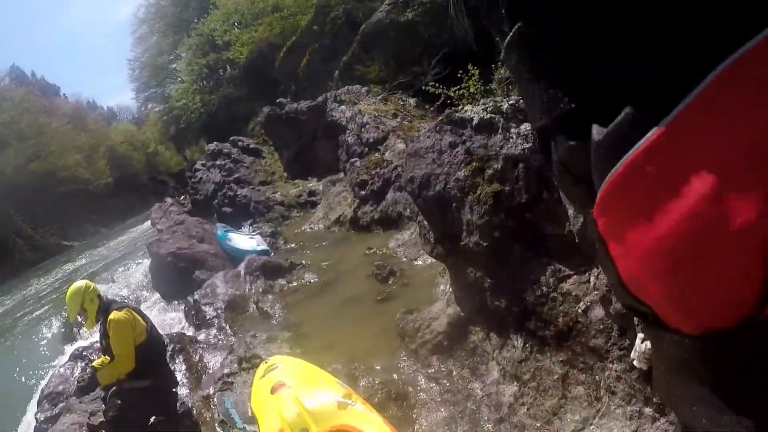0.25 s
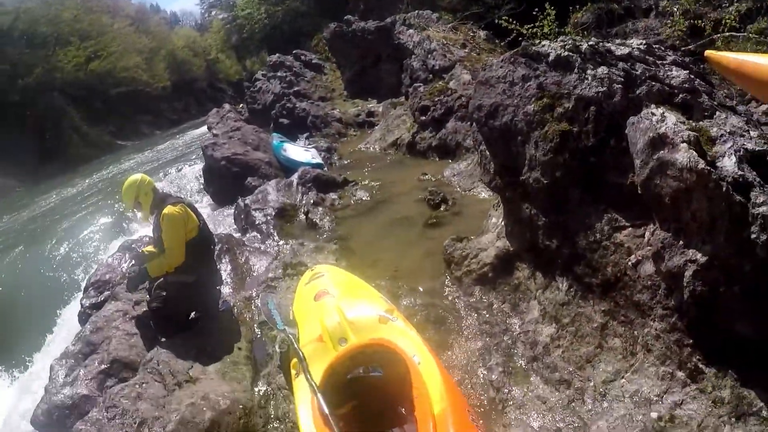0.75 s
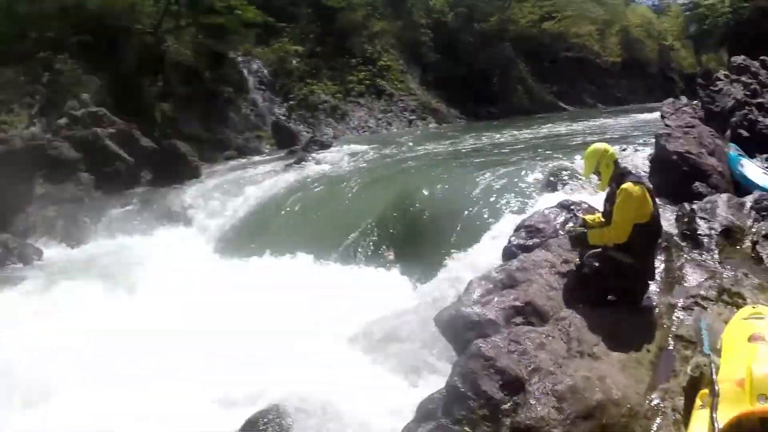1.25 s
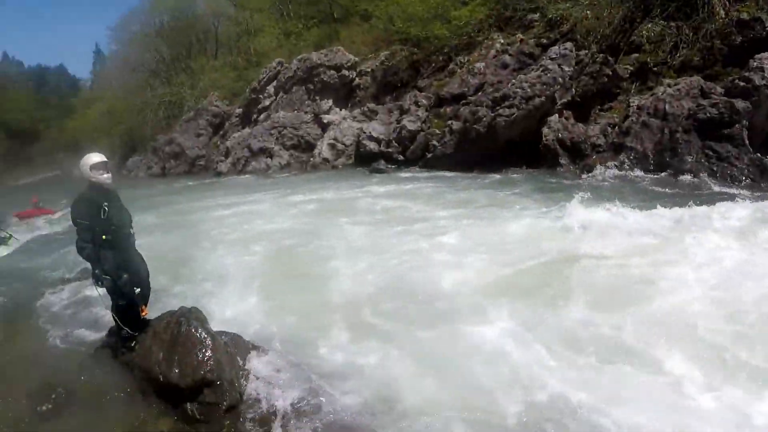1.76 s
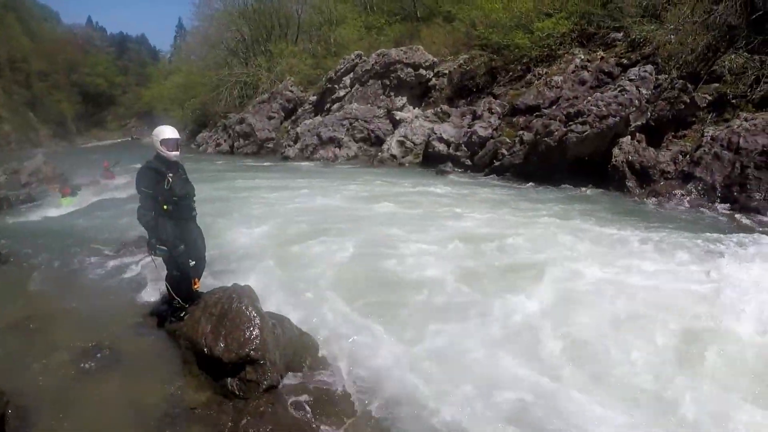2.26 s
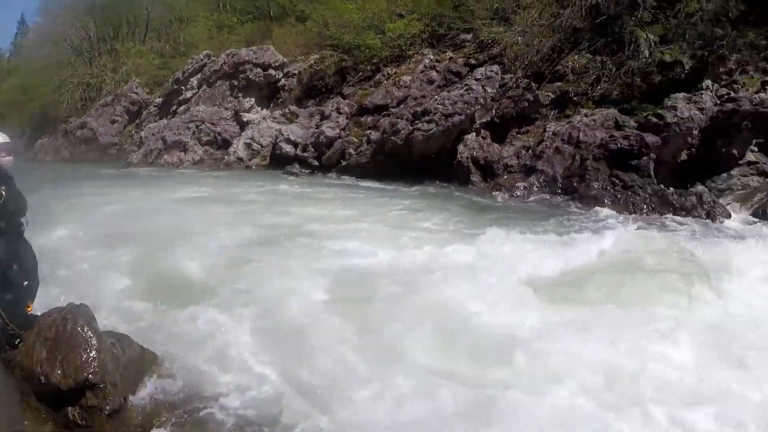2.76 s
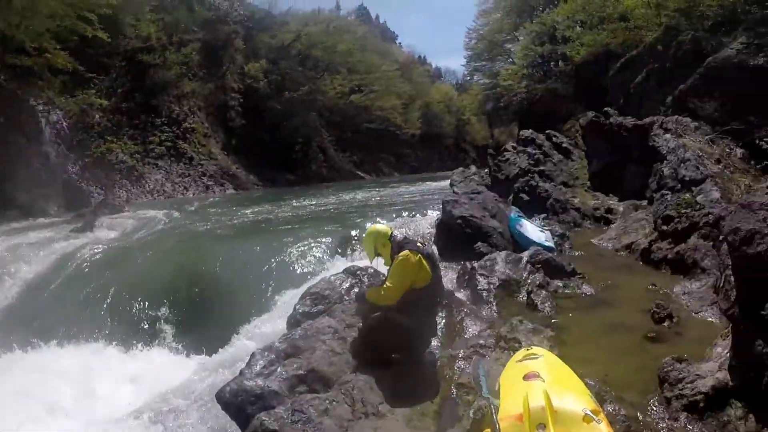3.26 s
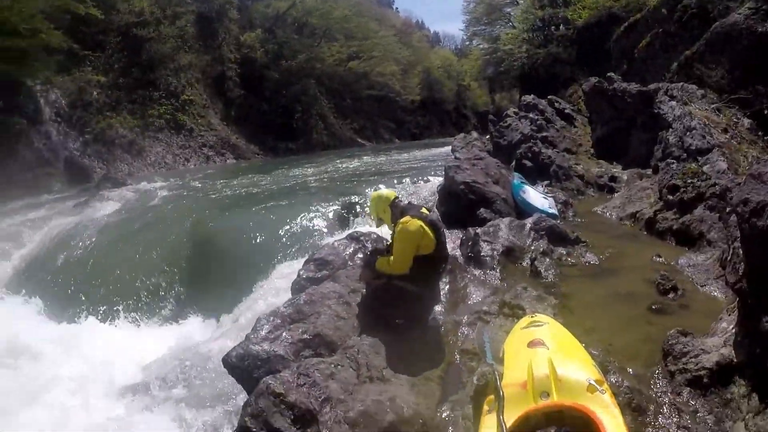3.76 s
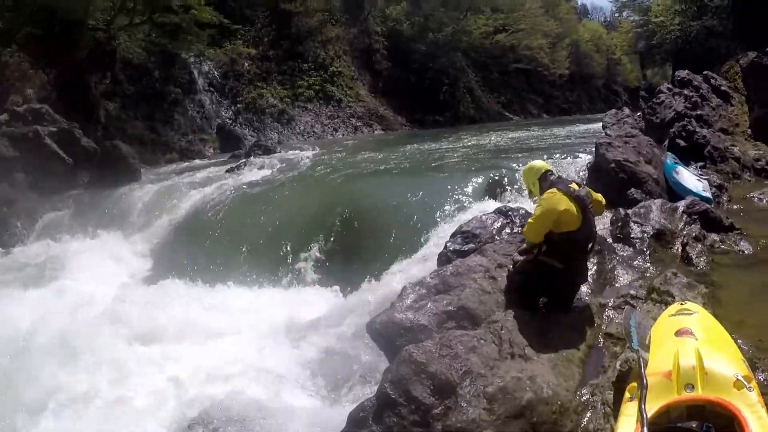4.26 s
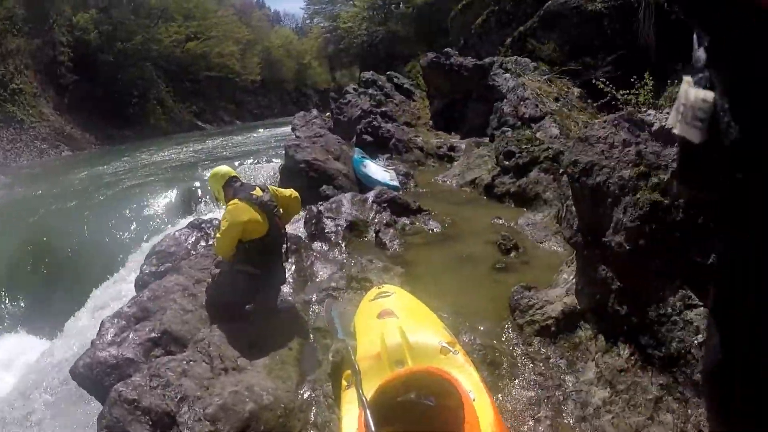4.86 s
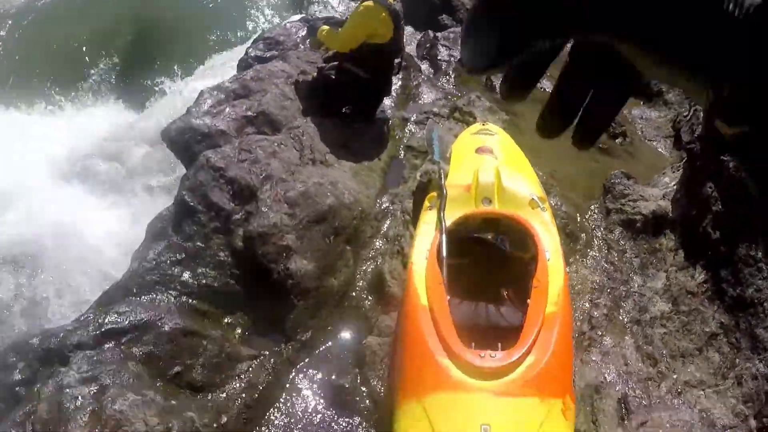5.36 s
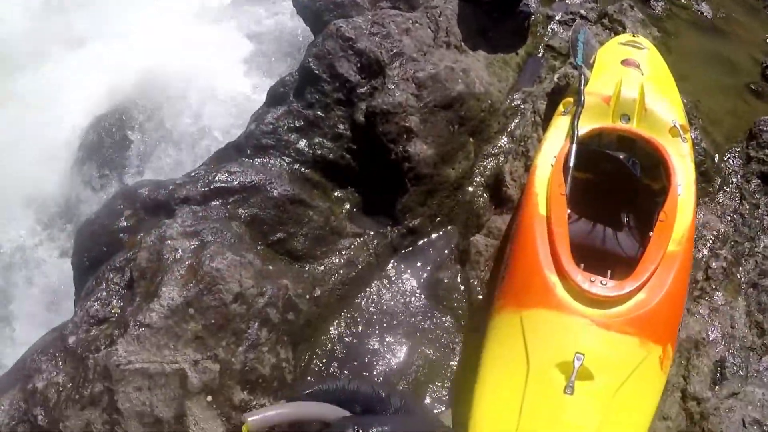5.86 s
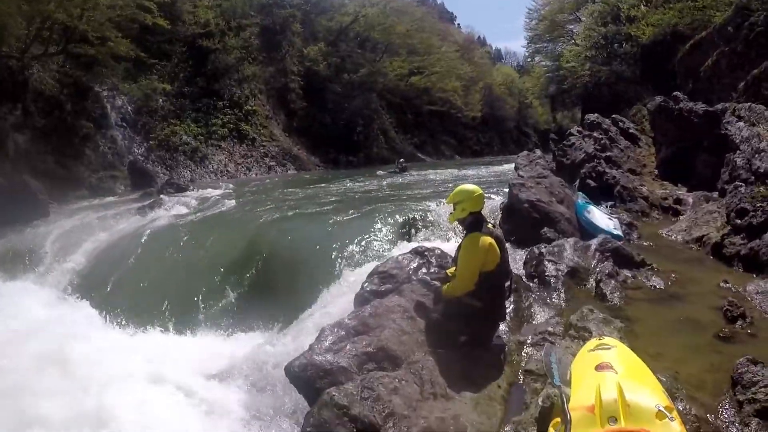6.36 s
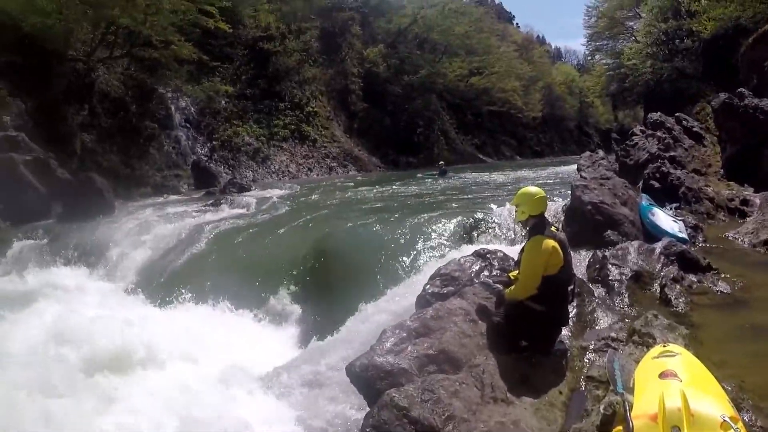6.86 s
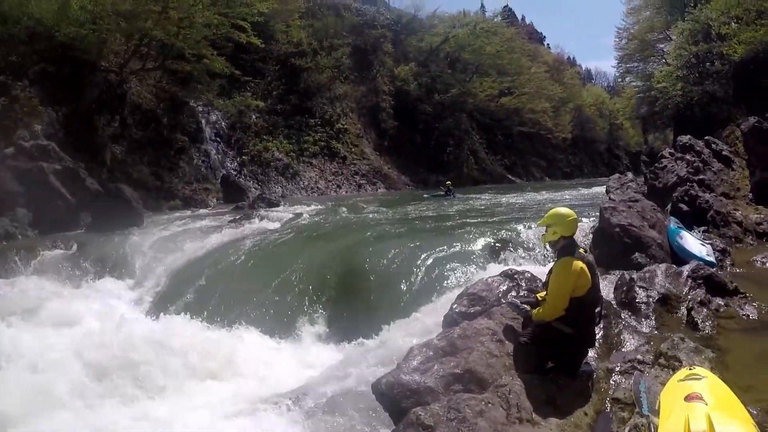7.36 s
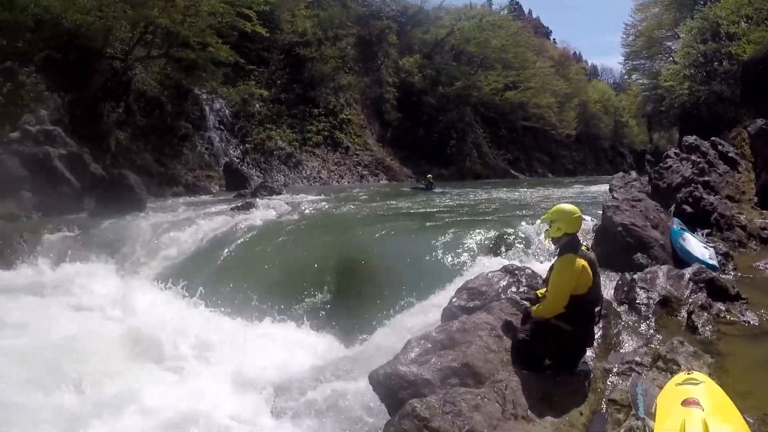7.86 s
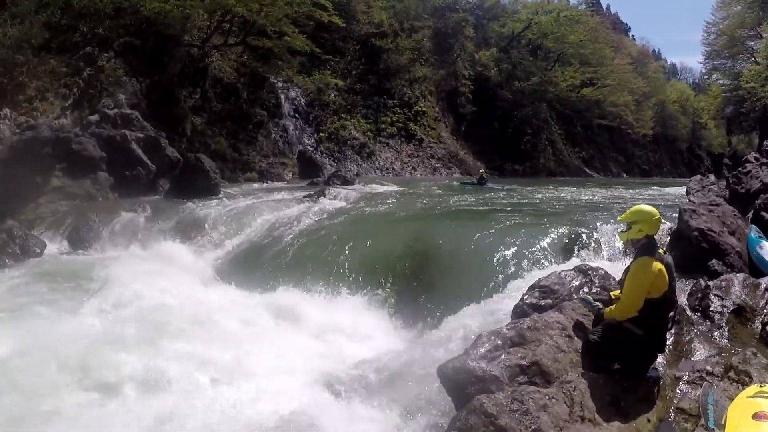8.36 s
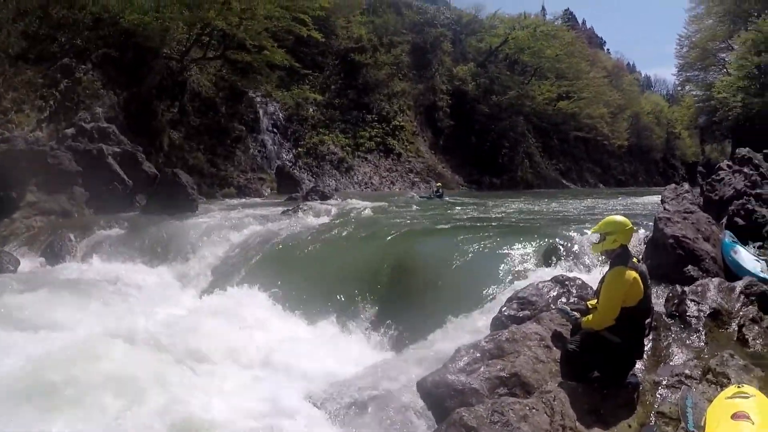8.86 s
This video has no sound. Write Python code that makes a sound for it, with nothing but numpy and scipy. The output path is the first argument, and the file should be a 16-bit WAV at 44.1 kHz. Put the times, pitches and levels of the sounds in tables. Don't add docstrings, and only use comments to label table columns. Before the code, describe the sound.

Outdoors on river rocks, white water pours over a ledge into a hole: a low roar, dense bubbling rush and faint high spray hiss, continuous for about 9 seconds. It is heard close through a sealed helmet housing, so it sounds boxy, with ringing resonances. From 0 to 1.2 s wind bumps softly over the water; around 1.2-1.6 s the head swings downstream, changing the tone and bringing more wind flutter. Low thumps and a strap drag come at 2.6-2.7 s, then the colour returns to the ledge near 3 s, with another rub. It is calmer until a thump at 4.76 s. At 5.15 s the strap snaps with a sharp, hard knock, during a brief heave of roar, followed by rubbing and deep pushes to 5.6 s as the head tips down. A small tick at 6.0 s cuts the wind; steady water continues to the end.

```python
import sys
import numpy as np
from scipy import signal
from scipy.fft import rfft, irfft, next_fast_len
from scipy.io import wavfile
from scipy.ndimage import uniform_filter1d, map_coordinates

SR = 44100
rng = np.random.default_rng(int(sys.argv[2]) if len(sys.argv) > 2 else 0)


def nominal_scale(level):
    x = np.asarray(level, float) / 20
    return 10 ** x


def dump_mix(stems):
    frames = np.atleast_2d(stems).T
    limited = np.clip(frames, -1, 1)
    pcm = np.round(limited * 32767).astype(np.int16)
    wavfile.write(sys.argv[1], SR, pcm)


N = 401751


def unit(x):
    return x / np.sqrt(np.mean(x ** 2) + 1e-20)


def noise():
    return rng.standard_normal(N)


def along(points, hz):
    f, v = np.transpose(points)
    return np.interp(np.log(hz + 1), np.log(f + 1), v)


def curves(rows, t=None):
    s, *cols = np.transpose(rows)
    t = np.arange(N) / SR if t is None else t
    return [np.interp(t, s, c) for c in cols]


def wobble(rate):
    knots = rng.standard_normal(int(N * rate / SR) + 4)
    return map_coordinates(knots, [np.arange(N) * rate / SR])


def coloured(x, spectrum):
    m = next_fast_len(N + SR // 2)
    gain = nominal_scale(along(spectrum, np.fft.rfftfreq(m, 1 / SR)))
    return unit(irfft(rfft(x, m) * gain, m)[:N])


def smoothed(x, size, axis=-1):
    return uniform_filter1d(uniform_filter1d(x, size, axis=axis), size, axis=axis)


def evened(x, seconds, share):
    power = np.abs(smoothed(x ** 2, round(seconds * SR)))
    return unit(x / (power + 0.02) ** (share / 2))


def hump(s, length):
    return np.exp(-(2 * (np.arange(N) / SR - s) / max(length, 0.02)) ** 2)


def gusty(calm_db, events):
    swells = sum((nominal_scale(db) * hump(s, length)) ** 2 for s, db, length in events)
    return np.sqrt(nominal_scale(calm_db) ** 2 + swells)


# time in seconds, turn downstream from 0 to 1, tip down from 0 to 1,
# low-mid echo from the rocks in dB; turn and tip both 0 face the ledge.
HEAD_POSE = [(0, 0.24, 0.2, 5.5), (.3, 0.3, 0.13, 7), (.75, 0.2, 0.7, 2.5), (1.05, 0.16, 0.4, 1.5),
             (1.2, 0.27, 0, -1), (1.4, 0.77, 0.05, 0.5), (1.6, 0.98, 0, -0.5), (2.85, 0.88, 0.4, 1),
             (3.05, 0.08, 0, 1), (4.5, 0, 0.03, 1), (4.75, 0.14, 0.27, 1), (5.05, 0.28, 0.3, 2),
             (5.3, 0.13, 0.45, 4), (5.6, 0, 1, 1), (5.95, 0.06, 0.6, 4), (6.15, 0.09, 0.2, 1.5),
             (7.5, 0.09, 0.08, 1), (9.11, 0.07, 0.2, 0)]


def head_pose(t=None):
    return curves(HEAD_POSE, t)


# frequency in Hz, level in dB per Hz.
ROAR_FACING = [(12, -64), (20, -34), (81, -37), (119, -42), (142, -3.5), (161, 0.5), (198, -4), (249, -0.5),
               (323, -9.5), (396, -14), (448, -13.5), (466, -23), (520, -21.5), (680, -46), (1140, -120)]
ROAR_TURNED = [(74, -42), (128, -3), (177, -6.5), (199, -5), (216, -7), (253, -11), (275, 2), (338, -3),
               (520, -22.5), (680, -61), (1140, -120)]
# middle in seconds, length in seconds, gain in dB.
ROAR_SWELLS = [
    (0, 0.22, 3.5),
    (1.24, 0.41, 2),
    (3.17, 0.19, 3),
    (3.75, 0.36, 2),
    (4.5, .4, 1),
    (5.286, 0.3, 7),
    (5.85, 0.74, 3),
    (7.55, 0.5, 1.5),
]


def roar(surge):
    turn, _, _ = head_pose()
    swell_db = sum(db * hump(s, length) for s, length, db in ROAR_SWELLS)
    facing = np.sqrt(1 - turn) * coloured(noise(), ROAR_FACING)
    turned = np.sqrt(turn) * coloured(noise(), ROAR_TURNED)
    return nominal_scale(-41.5 + swell_db + 0.18 * surge + 1.13 * wobble(13)) * (facing + turned)


def bubbles(count, mid_hz, spread, cycles, size_db):
    at, size = rng.random((count, 2)).T
    hz = mid_hz * np.exp(spread * rng.standard_normal(count))
    hz = np.clip(hz, 700, 9000)[:, None]
    k = np.arange(512)
    turns = hz * k / SR
    ring = np.sin(2 * np.pi * turns * (1 + 0.092 * turns / cycles))
    grain = ring * np.exp(-3 * turns / cycles) * (1 - np.exp(-turns))
    grain = grain * nominal_scale(-size_db * np.log(1 - size))[:, None] * np.sqrt(hz / mid_hz)
    places = (at * N).astype(int)[:, None] + k
    return unit(np.bincount(places.ravel(), grain.ravel(), N + len(k))[:N])


def bumps(modes, hz):
    return sum(db / (1 + (2 * (hz - c) / w) ** 2) for c, w, db in modes)[:, None]


# frequency in Hz, width in Hz, gain in dB (negative = notch).
LEDGE_MODES = [(1012, 36, 14.5), (1442, 39, 13), (1550, 60, -2.5), (1682, 127, 8), (1878, 108, 11),
               (2050, 90, -2.5), (2126, 92, 6), (2940, 290, 3.5), (3266, 160, 5.5), (3540, 120, 0.5),
               (3804, 170, 7), (4160, 400, 3), (4870, 290, -3.5), (5480, 520, 7.5), (6440, 450, 9)]
DOWNSTREAM_MODES = [(1490, 100, -6), (2600, 200, -0.5), (1240, 300, 0.5), (1790, 300, 2.5),
                    (2000, 130, 1.5), (2256, 290, 8), (2930, 170, 4), (3550, 170, -5.5), (4050, 230, 0),
                    (4330, 330, 2.5), (5200, 300, 2), (5650, 300, 2.5), (6500, 430, 5.5)]
TIPPED_MODES = [(1420, 270, 2.5), (1920, 500, 1.5), (2650, 120, -7), (2710, 250, 7.5), (3320, 200, 1.5),
                (3780, 300, 5), (4470, 400, 1.5), (5000, 300, -2), (5750, 550, 6.5), (6500, 330, 8)]
# middle in seconds, length in seconds, frequency in Hz,
# width in Hz, gain in dB (negative = notch).
ANGLE_FLARES = [(.84, .35, 2950, 260, 8), (0.82, 0.4, 2100, 200, 5.5), (1.5, 0.3, 2050, 170, 5),
                (1.7, .25, 4000, 120, 11), (2.72, 0.14, 1800, 150, 4), (2.8, .3, 2050, 170, 5),
                (2.3, .4, 2150, 130, 2.5), (1.16, .2, 1800, 170, 3), (4.65, .15, 2150, 150, 4),
                (2.9, 0.18, 3200, 260, 6), (4.95, 0.13, 2100, 200, 7), (5.75, .5, 2800, 150, 2),
                (4, 1.9, 5500, 900, -2.5), (1.2, .45, 5500, 900, -3.5), (2.72, .12, 1050, 400, 5)]


def housing_gain(hz, t):
    turn, tip, echo_db = head_pose(t)
    facing = np.clip(1 - turn - tip, 0, 1)
    gain_db = facing * bumps(LEDGE_MODES, hz)
    gain_db = gain_db + turn * bumps(DOWNSTREAM_MODES, hz) + tip * bumps(TIPPED_MODES, hz)
    gain_db = gain_db + echo_db * bumps([(670, 1500, 0.85)], hz)
    for s, length, *mode in ANGLE_FLARES:
        gain_db = gain_db + np.exp(-(2 * (t - s) / length) ** 4) * bumps([mode], hz)
    return nominal_scale(gain_db)


# frequency in Hz, level in dB per Hz.
RUSH_SPECTRUM = [(350, -120), (450, -9.5), (650, -8.5), (880, -9.5), (1000, -9), (1300, -1.5), (2500, -4.5),
                 (4500, -8), (6000, -17), (7200, -28), (8500, -46.5), (10000, -120)]
# middle in seconds, length in seconds, gain in dB.
ARM_SHADOW = (0.29, 0.84, -2.3)


def rush(surge):
    turn, tip, _ = head_pose()
    middle, length, shade_db = ARM_SHADOW
    level_db = -37 + 1.6 * turn + 1.1 * tip + shade_db * hump(middle, length) + 0.034 * surge
    froth = noise() + 0.23 * bubbles(count=9000, mid_hz=2543, spread=0.602, cycles=8.2, size_db=1)
    hz, t, z = signal.stft(coloured(froth, RUSH_SPECTRUM), SR, nperseg=1024, noverlap=768)
    gain = housing_gain(hz, t)
    gain = gain / np.sqrt(np.mean(np.abs(z) ** 2, 1) @ gain ** 2)
    patches = smoothed(rng.standard_normal(z.shape), 8, axis=0)
    patches = unit(smoothed(patches, 12, axis=1))
    z = z * gain * nominal_scale(0.65 * patches)
    return nominal_scale(level_db) * unit(signal.istft(z, SR, nperseg=1024, noverlap=768)[1][:N])


# frequency in Hz, level in dB per Hz.
SPRAY_SPECTRUM = [(5500, -120), (6300, -13), (7000, -1), (8020, 0.5), (9260, -0.5), (11500, -9.5),
                  (13200, -14.5), (14600, -19.5), (15100, -25), (15250, -120)]


def spray(surge):
    _, tip, _ = head_pose()
    level_db = -57 + 0.6 * tip + 0.45 * surge + 0.3 * wobble(15)
    return nominal_scale(level_db) * coloured(noise(), SPRAY_SPECTRUM)


def water():
    surge = wobble(9)
    return roar(surge) + rush(surge) + spray(surge)


def wind_dip():
    t = np.arange(N) / SR
    held = hump(TICK_STEP[0], 0.03)
    for s, _, hz, cycles, _ in INWARD_PUSHES + OUTWARD_PULLS:
        length = cycles / hz
        held = held + np.exp(-((t - s - length / 2) / length * 1.6) ** 4)
    return 0.8 * np.clip(held, 0, 1)


# frequency in Hz, level in dB per Hz.
BUFFET_SPECTRUM = [(4.7, -38), (8.0, 1), (32, 5), (49, 0.5), (65, -18.5), (84, -30), (140, -120)]
FLUTTER_SPECTRUM = [(35, -120), (50, -7.5), (65, 3), (95, -5.5), (120, -6.5), (140, -25.5), (300, -27.5),
                    (500, -120)]
# time in seconds, level in dB.
BREEZE = [(0, -33.5), (.6, -33), (1.15, -31), (1.5, -22.5), (1.95, -25), (2.05, -31.5), (3.1, -34.5),
          (3.5, -36.5), (4.1, -41.5), (4.7, -34), (5.2, -37), (6, -33.5), (6.6, -35), (7.5, -34),
          (7.6, -40), (8.4, -50), (9.11, -56)]
# middle in seconds, peak level in dB,
# length in seconds.
PORT_GUSTS = [(0.076, -22, .14), (0.177, -20, 0.045), (0.315, -27, 0.22), (.49, -21.5, 0.047),
              (0.683, -15, 0.036), (0.832, -25, 0.34), (1.035, -23, .08), (1.18, -21, 0.056),
              (1.25, -24.5, 0.11), (1.42, -20.5, 0.13), (1.66, -20, 0.17), (1.843, -25, 0.089),
              (2.067, -24, 0.051), (2.168, -22, 0.041), (2.432, -21, 0.053), (2.64, -19, 0.043),
              (2.702, -22, .06), (2.88, -24.5, 0.23), (3.056, -24, 0.047), (3.727, -23.5, 0.036),
              (4.385, -35, 0.073), (4.58, -28.5, 0.23), (4.786, -24, .06), (4.9, -31, 0.06),
              (5.072, -28.5, 0.075), (5.312, -24, .14), (5.495, -15.5, 0.13), (5.68, -30, .07),
              (5.787, -29, .06), (5.888, -28, 0.077)]
PORT_EDDIES = [(.5, -40, .08), (0.687, -27, 0.053), (.78, -32.5, .16), (0.992, -33, .06),
               (1.077, -27, 0.057), (1.22, -25.5, 0.11), (1.32, -21.5, 0.047), (1.41, -26, 0.041),
               (1.516, -26.5, 0.1), (1.676, -34, 0.25), (2.01, -38, .04), (2.07, -33, 0.035),
               (2.38, -41, .1), (2.46, -39, .06), (2.614, -27, 0.057), (2.707, -21, 0.042),
               (2.868, -36.5, 0.22), (3.007, -31, 0.089), (3.086, -31, .07), (3.25, -39, 0.44),
               (3.67, -43, .08), (4.79, -37, .06), (4.898, -42, .06), (5.166, -27, 0.034),
               (5.298, -30, 0.2), (5.474, -25, .1), (5.702, -36, .12), (5.888, -31.5, 0.055)]


def wind():
    buffet = evened(coloured(noise(), BUFFET_SPECTRUM), seconds=0.039, share=0.97)
    flutter = evened(coloured(noise(), FLUTTER_SPECTRUM), seconds=0.03, share=0.85)
    flutter = unit(nominal_scale(1.5 * wobble(28)) * (1 + 0.6 * np.abs(buffet)) * flutter)
    filter_db = -17 * (np.arange(N) / SR > TICK_STEP[0])
    breeze_db = curves(BREEZE)[0] + filter_db
    buffet = gusty(breeze_db + wobble(8), PORT_GUSTS) * buffet
    flutter = gusty(breeze_db + wobble(6.6) - 9, PORT_EDDIES) * flutter
    return (1 - wind_dip()) * (buffet + flutter)


# frequency in Hz, level in dB per Hz.
BRIGHT_FLUTTER_SPECTRUM = [(60, -120), (90, -12), (120, 6), (160, -4.5), (250, -16), (400, -30), (700, -120)]
# middle in seconds, peak level in dB, length in seconds.
BRIGHT_EDDIES = [
    (2.2, -45, .1),
    (2.705, -36.5, 0.12),
    (3.055, -31, 0.184),
    (4.663, -40, .08),
    (4.95, -40.5, 0.16),
    (5.26, -34, 0.14),
    (5.555, -35, 0.45),
]


def bright_flutter():
    bright = unit(nominal_scale(4.8 * wobble(40)) * coloured(noise(), BRIGHT_FLUTTER_SPECTRUM))
    return gusty(-90, BRIGHT_EDDIES) * bright


# start in seconds, peak level in dB,
# frequency in Hz, length in cycles, squareness.
OUTWARD_PULLS = [
    (2.605, -13.5, 36.2, 1.4, 0.48),
    (2.69, -14.5, 34.6, 1.5, 0.57),
    (4.763, -16.5, 70, 1.63, 0.42),
    (5.225, -21, 127, 2.84, 0.38),
]
INWARD_PUSHES = [
    (5.1464, -11, 88.3, 1.1, 1.43),
    (5.2, -18.5, 45, .6, .5),
    (5.432, -12, 28.7, 2.4, 0.55),
    (5.5, -18.5, 44.7, 1.5, 0.68),
]


def pushes():
    out, t = np.zeros(N), np.arange(SR // 4) / SR
    for sign, rows in [(1, INWARD_PUSHES), (-1, OUTWARD_PULLS)]:
        for s, db, hz, cycles, square in rows:
            u = np.clip(hz * t / cycles, 0, 1)
            edge = np.minimum(u * (1 + square ** 2), (1 - u) * (1 + square))
            fade = np.sin(np.pi / 2 * np.clip(edge * 2, 0, 1)) ** 2
            swing = np.tanh(square * np.sin(2 * np.pi * hz * t)) / np.tanh(square)
            out[round(s * SR):][:len(t)] += sign * nominal_scale(db) * fade * swing * (u < 1)
    return out


def build_and_decay(since, build, t60):
    growth = np.exp(np.minimum(since, 0) / build)
    return np.where(since < 0, growth, nominal_scale(-60 * np.abs(since) / t60))


# time in seconds, peak level in dB, build-up in seconds.
STRAP_SNAP = (5.1468, -10, .0028)
# frequency in Hz, level in dB, decay time T60 in seconds.
SHELL_MODES = [(1500, 3, 0.017), (1150, -9, 0.0092), (930, -12, .012), (1980, -6, 0.0072),
               (2620, -18, .005), (3520, -16, .004), (290, 6, 0.0073), (580, -6, 0.0017)]


def snap():
    s, db, build = STRAP_SNAP
    since = np.arange(N) / SR - s
    out = np.zeros(N)
    for hz, level, t60 in SHELL_MODES:
        ring = np.cos(2 * np.pi * hz * since + rng.uniform(-2.1, 1))
        out -= nominal_scale(db - 9.5 + level) * build_and_decay(since, build, t60) * ring
    band = signal.butter(3, [600, 3300], "bandpass", fs=SR, output="sos")
    crack = signal.sosfilt(band, build_and_decay(since, build, 0.019) * noise())
    return out + nominal_scale(db - 6.5) * crack


# time in seconds, step in dB, length of the swing cut off in seconds.
TICK_STEP = (6.0122, -23, .0058)


def tick():
    s, db, rise = TICK_STEP
    cut = np.arange(round(rise * SR)) / (rise * SR)
    out = np.zeros(N)
    out[round(s * SR) - len(cut):][:len(cut)] = nominal_scale(db) * np.sin(np.pi / 2 * cut) ** 0.5
    return out


def knocks():
    dull = signal.butter(2, 4500, fs=SR, output="sos")
    return signal.sosfilt(dull, pushes() + snap()) + tick()


def scene():
    return (water() + wind() + bright_flutter() + knocks())[None]


def low_pass(x):
    return signal.sosfilt(signal.butter(12, 15720, fs=SR, output="sos"), x)


def record(dry):
    return low_pass(dry)


dry = scene()
out = record(dry)
dump_mix(out)
```